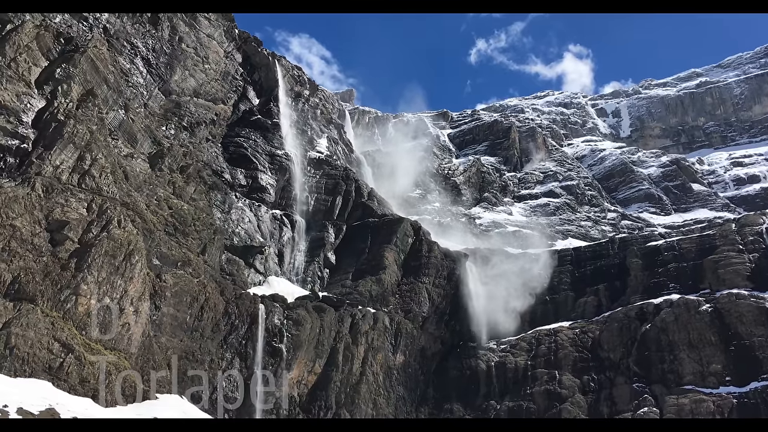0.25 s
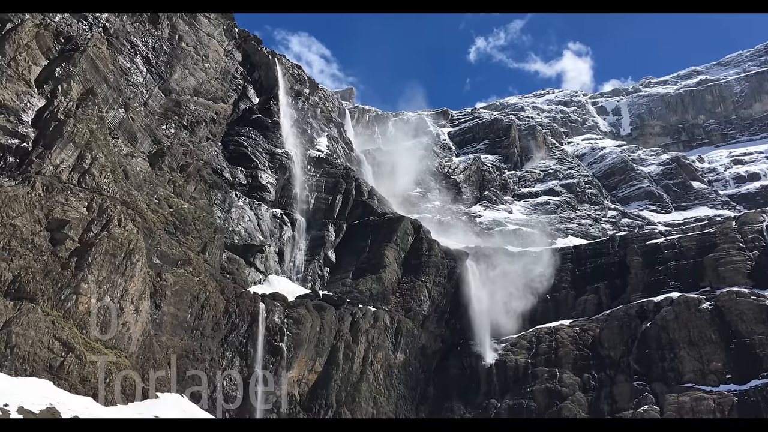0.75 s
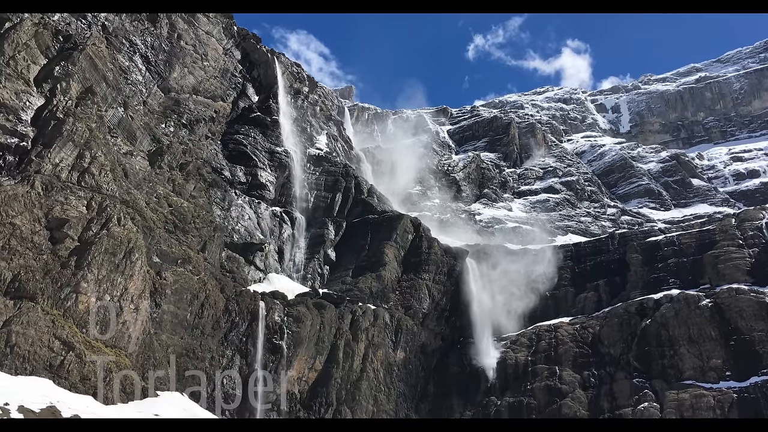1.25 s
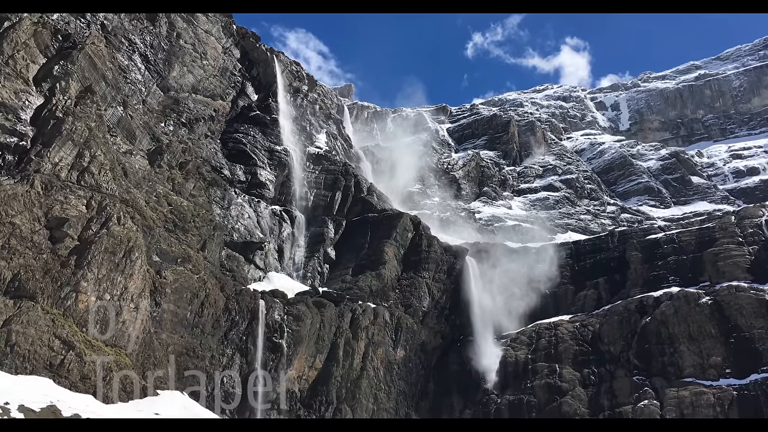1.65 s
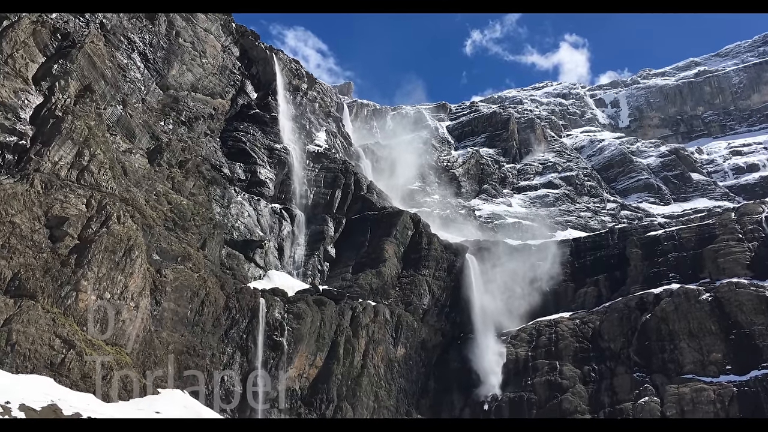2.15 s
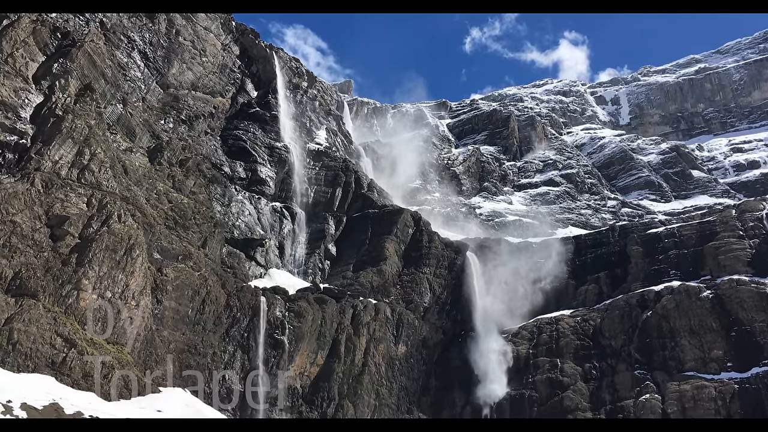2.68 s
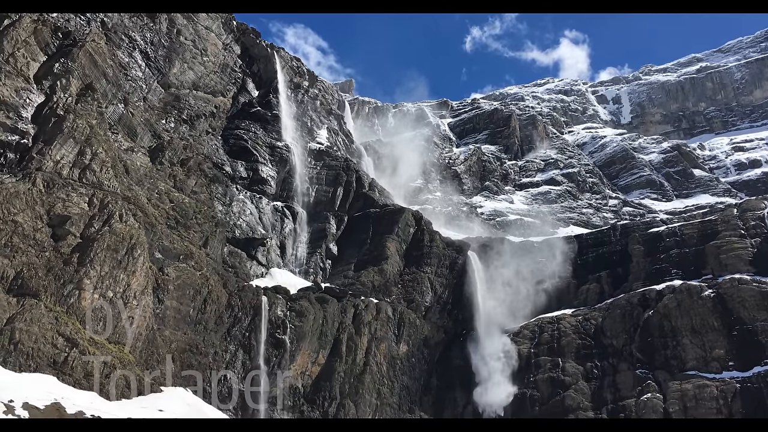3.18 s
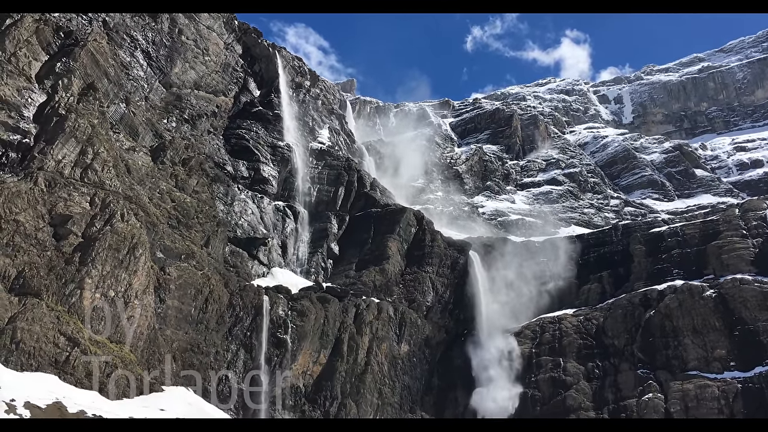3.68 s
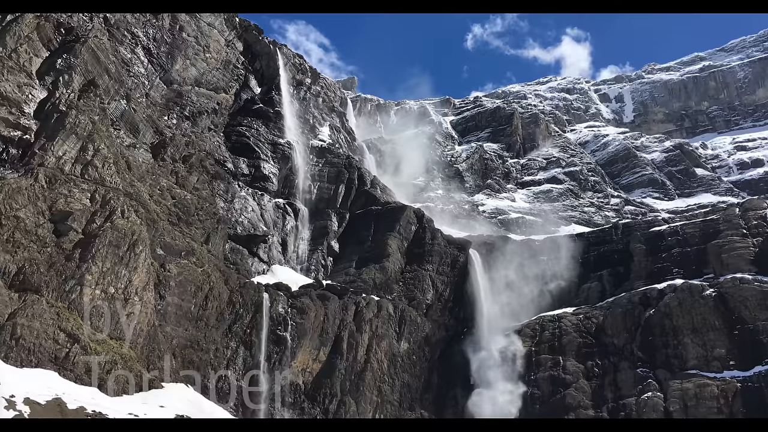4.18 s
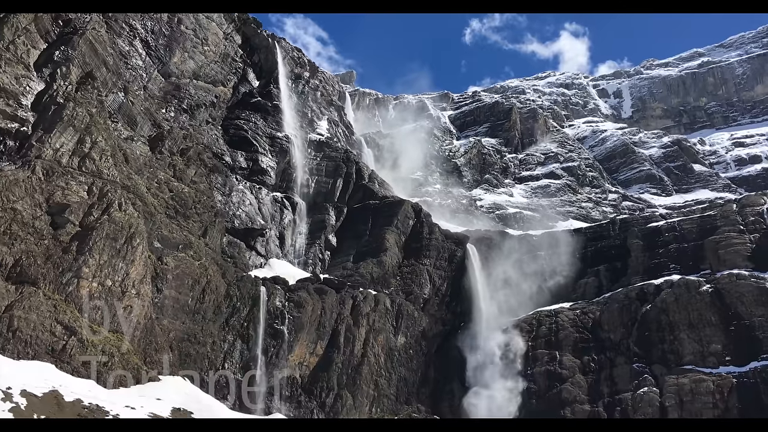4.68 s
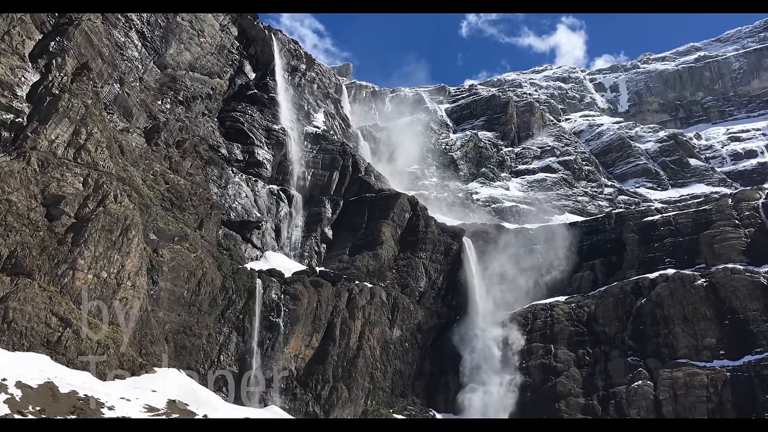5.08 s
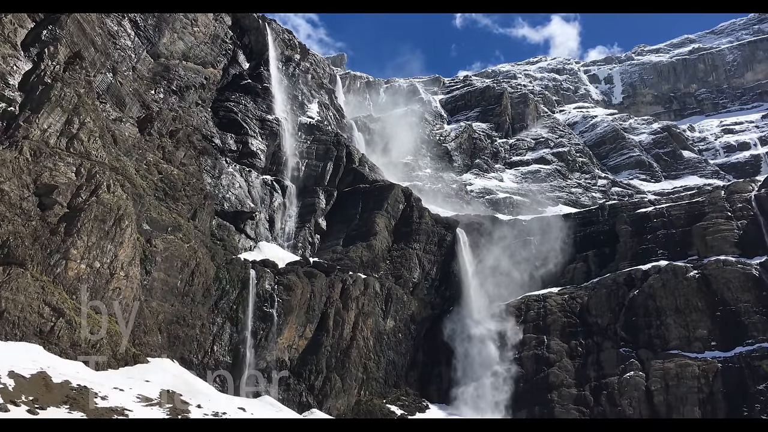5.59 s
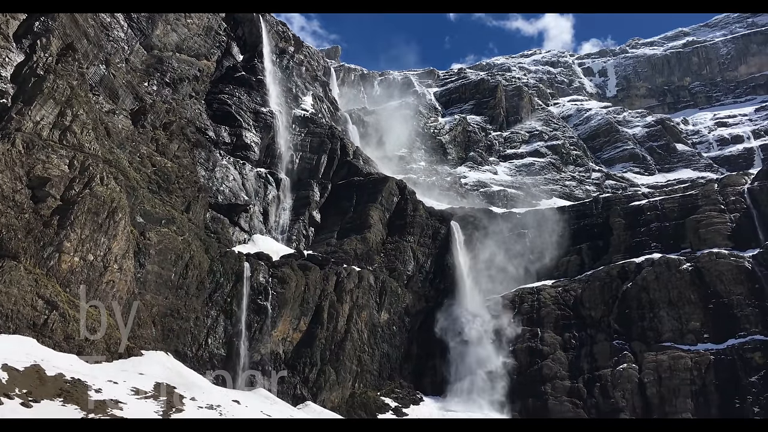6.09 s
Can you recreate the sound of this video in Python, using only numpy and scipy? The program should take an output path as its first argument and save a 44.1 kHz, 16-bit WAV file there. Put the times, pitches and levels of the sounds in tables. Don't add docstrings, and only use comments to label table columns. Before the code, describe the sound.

Low, smooth roar of far waterfalls, then tumbling snow and ice crackle and thump down a cliff, swelling into booming, muffled rumble.

```python
import sys
import numpy as np
from scipy import signal
from scipy.fft import rfft, irfft, next_fast_len
from scipy.io import wavfile
from scipy.ndimage import map_coordinates

SR = 44100
rng = np.random.default_rng(int(sys.argv[2]) if len(sys.argv) > 2 else 0)


def convert_level_to_amplitude(level_db):
    exponent = np.asarray(level_db, float) / 20
    return 10 ** exponent


def waveform_to_disk(signal):
    frames = np.transpose(np.atleast_2d(signal))
    scaled = np.clip(frames, -1, 1) * 32767
    samples = np.round(scaled).astype(np.int16)
    wavfile.write(sys.argv[1], SR, samples)


N = 279594

# frequency in Hz, level in dB per Hz.
HISS_COLOUR = [(3000, -18.5), (4800, 1.5), (6000, -3), (7600, -7.5), (9500, -6), (10500, -10),
               (11800, -7.5), (15000, -3.5), (16500, -36)]
# frequency in Hz, gain in dB.
MICROPHONE = [(18, -10.5), (32, -8.5), (42, -2), (2550, 1.5), (2800, -1), (3600, 2), (4500, 0), (4900, -3),
              (6500, -34)]
# frequency in Hz, level in dB per Hz.
FALLS_COLOUR = [(13, -44), (22, -13.5), (48, -1.5), (80, -2.5), (131, 1), (268, -5), (327, -7.5), (374, -8),
                (854, -15), (934, -13.5), (1250, -15), (2790, -25.5), (4550, -44), (5920, -75),
                (10000, -120)]
# frequency in Hz, time to fall by 60 dB in seconds.
VALLEY_DECAY = [(60, 0.97), (500, 0.93), (4000, 0.64)]

# frequency in Hz, level in dB per Hz.
BOOM_COLOUR = [(13, -39.5), (22, -21.5), (49, 3), (65, 2.5), (92, -7), (105, -0.5), (140, -23.5),
               (230, -120)]
THUD_COLOUR = [(62, -38), (105, -5.5), (210, 1), (320, -9), (420, -38.5), (700, -120)]
HEAP_COLOUR = [(62, -34.5), (105, -3.5), (124, -4), (205, 0), (285, -9), (320, -14.5), (420, -39.5),
               (700, -120)]
TUMBLE_COLOUR = [(190, -44.5), (320, -2.5), (440, 1), (495, -5.5), (674, -2.5), (840, -10.5), (880, -12.5),
                 (1140, -33), (1940, -120)]
CLATTER_COLOUR = [(520, -33), (880, 0), (1060, -1.5), (1480, -4), (1810, -9), (2110, -11.5), (3410, -28),
                  (4550, -46), (5920, -80), (10000, -120)]
SPRAY_COLOUR = [(520, -33), (880, 0), (1010, -2), (1270, -2.5), (2140, -9.5), (2790, -23), (3500, -27.5),
                (4550, -45), (5920, -69.5), (10000, -120)]
# frequency in Hz, level in dB per Hz.
CRUSH_COLOUR = [(120, -120), (250, -27), (500, -7), (1000, -2.5), (1600, -7), (2100, -16), (2800, -43.5),
                (5000, -120)]
ICE_COLOUR = [(700, -120), (1500, -28.5), (2200, -5), (2700, -9.5), (3500, -20), (4500, -29.5), (5200, -58),
              (7000, -120)]

# time in seconds, flow in dB, heft from 0 (small dry pieces) to 1 (heavy wet masses).
FLOW = [(2.37, -40, 0.03), (2.6, -37.5, 0.2), (2.7, -39, .1), (2.95, -37, .2), (3.13, -37, .25),
        (3.4, -34, .3), (3.6, -35, .35), (3.9, -34, .4), (4.3, -33.5, .45), (4.75, -35.5, .55),
        (5.05, -33, 0.5), (5.36, -35.5, 0.7), (5.7, -35, .9), (6.0, -36.5, .95), (6.34, -34.5, 0.9)]
# time in seconds, gain in dB.
FRONT = [
    (2.0, -30),
    (2.08, -13),
    (2.27, -9),
    (2.32, -5),
    (2.38, 0),
]
# time in seconds, lift of the boom in dB.
SLABS = [(2.63, 8.5), (2.78, 11), (2.92, 6.5), (3.85, 3.5), (4.18, 4.5), (4.45, 4.5), (4.78, 8), (4.9, 8),
         (5.08, 6.5), (5.22, 8.5), (5.29, 9.5), (5.48, 10.5), (5.62, 6), (5.79, 7), (6.0, 7), (6.2, 6.5),
         (6.3, 6.5)]
# start in seconds, peak in dB, thud pitch in Hz, crushed snow in dB against the peak.
LEADERS = [(0.826, -36, 300, -2), (2.111, -32, 113, -10), (2.146, -33, 178, -2), (2.17, -28, 130, -14),
           (2.212, -23, 199, -13), (2.243, -31, 205, -2), (2.261, -29, 160, -12), (2.291, -25, 400, -6),
           (2.334, -27, 420, -6), (2.345, -25, 190, -11), (2.434, -31, 410, -5), (2.551, -28, 415, -10),
           (2.818, -17.5, 300, -12), (3.147, -20, 230, -13), (3.501, -21, 420, -13)]
# start in seconds, peak in dB, thud pitch in Hz, crush in dB.
BLOCKS = [(2.378, -26.5, 458, -3.5), (2.467, -27, 426, -1), (2.605, -23, 382, -12.5), (2.719, -28, 206, -7),
          (2.775, -28.5, 251, -15), (3.221, -22, 232, -13), (3.452, -28, 148, -11.5),
          (3.544, -16.5, 448, -16.5), (3.595, -13, 219, -13), (3.651, -19.5, 254, -22.5),
          (3.671, -12, 282, -14), (3.739, -18.5, 610, -9), (3.776, -23, 194, -8),
          (3.828, -17.5, 192, -22.5), (3.897, -10.5, 217.5, -14), (4.074, -25.5, 760, -10),
          (4.117, -20.5, 259, -14), (4.367, -21, 231, -9.5), (4.586, -13, 239, -15.5),
          (4.789, -22, 673, -11.5), (4.856, -24.5, 146.3, -15.5), (5.004, -16.5, 543, -16.5),
          (5.019, -14.5, 451, -13), (5.049, -22.5, 674, -13.5), (5.084, -17, 223, -16),
          (5.351, -22.5, 597, -9), (5.534, -18.5, 190, -24), (5.749, -18.5, 195, -22.5),
          (6.208, -21, 142.4, -15), (6.301, -20, 131.4, -22.5)]


def unit(x):
    return x / np.sqrt(np.mean(x ** 2) + 1e-20)


def along(points, hz):
    f, v = np.transpose(points)
    return np.interp(np.log(hz + 1), np.log(f + 1), v)


def curves(rows):
    s, *columns = np.transpose(rows)
    return [np.interp(np.arange(N) / SR, s, c) for c in columns]


def wobble(rate):
    return map_coordinates(rng.standard_normal(N // 100), [np.arange(N) * rate / SR])


def coloured(x, spectrum):
    m = next_fast_len(N + 8192)
    gain = convert_level_to_amplitude(along(spectrum, np.fft.rfftfreq(m, 1 / SR)))
    return irfft(rfft(x, m) * gain, m)[:N]


def hiss():
    hz, t, z = signal.stft(coloured(rng.standard_normal(N), HISS_COLOUR), SR, nperseg=2048)
    flicker = 0.5 * wobble(6)[::1024] + 1.1 * wobble(35)[::1024]
    drift_hz = np.interp(t, [0, 1.5, 3, 4, 6.3], [800, 1300, 900, -100, 300])
    reach_hz = 850 * np.resize(flicker, len(t)) + drift_hz
    ragged_hz = 800 * np.repeat(rng.standard_normal((65, len(t))), 16, axis=0)[:len(hz)]
    edge_hz = 12000
    kept = (hz[:, None] < edge_hz) | (hz[:, None] + ragged_hz < edge_hz + reach_hz)
    noise = signal.istft(z * kept, SR, nperseg=2048)[1][:N]
    return convert_level_to_amplitude(-81.5) * unit(noise)


def waterfalls():
    drift = convert_level_to_amplitude(0.25 * wobble(5) + 0.37 * wobble(11) + 0.56 * wobble(40))
    return convert_level_to_amplitude(-42) * unit(coloured(drift * rng.standard_normal(N), FALLS_COLOUR))


def bumps(rows, half_s):
    t = np.arange(0, N + 64, 64) / SR
    lift = sum(db * np.exp(-((t - s) / half_s) ** 2) for s, db in rows)
    return np.interp(np.arange(N) / SR, t, lift)


def levels(cloud_s):
    flow_db, heft = curves(FLOW)
    surge_s, surge_db_per_db, surge_from_db = 0.03, 0.33, -24
    surges = [(s + surge_s / 2, surge_db_per_db * max(db - surge_from_db, 0))
              for s, db, *_ in [*BLOCKS, *LEADERS]]
    surge_db = bumps(surges, surge_s)
    boom_db = flow_db - 14.5 + 11 * heft + bumps(SLABS, half_s=0.03)
    thud_db = flow_db - 2 + 4.5 * heft + surge_db
    tumble_db = flow_db - 0.15 - 0.73 * heft + 0.47 * surge_db
    steadier_db = flow_db.mean() + 0.65 * (flow_db - flow_db.mean())
    clouded = np.arange(N) / SR > cloud_s
    clatter_db = steadier_db - 1 - 6.5 * heft - 5 * clouded + 0.2 * surge_db
    return boom_db, thud_db, tumble_db, clatter_db


def hail(per_s, spread_db, life_s, echo):
    when, size = rng.random((4000, 2)).T
    struck = np.cumsum(-np.log(1 - when) / per_s) * SR
    power = convert_level_to_amplitude(2 * spread_db * np.minimum(-np.log(1 - size), 2.2))
    heard = struck < N
    spikes = np.bincount(struck[heard].astype(int), power[heard], N)
    u = np.arange(SR // 8) / SR / life_s
    swell = np.abs(signal.fftconvolve(spikes, u * np.exp(-u))[:N])
    return (swell / swell.mean() + echo) / (1 + echo)


def slide():
    cloud_s = 3.11
    heap_s = 5.0
    shared = hail(per_s=65, spread_db=0.5, life_s=0.0062, echo=1.4)
    boom_db, thud_db, tumble_db, clatter_db = levels(cloud_s)

    def debris(colour, part, life_s, echo):
        own = hail(per_s=42, spread_db=4.5, life_s=life_s, echo=echo)
        power = part * shared + (1 - part) * own
        return unit(coloured(np.sqrt(power) * rng.standard_normal(N), colour))

    t = np.arange(N) / SR
    heaped = np.clip((t - heap_s) / 0.54 + 0.5, 0, 1)
    muffled = np.clip((t - cloud_s) / 0.012, 0, 1)
    boom = debris(BOOM_COLOUR, 0.13, 0.032, 6.4)
    thud = np.sqrt(1 - heaped) * debris(THUD_COLOUR, 0.17, 0.005, 6.9)
    thud += np.sqrt(heaped) * debris(HEAP_COLOUR, 0.57, 0.006, 6.2)
    tumble = debris(TUMBLE_COLOUR, 0.68, 0.0024, 0.76)
    clatter = np.sqrt(1 - muffled) * debris(CLATTER_COLOUR, 0.24, 0.0016, 4.0)
    clatter += np.sqrt(muffled) * debris(SPRAY_COLOUR, 0.23, 0.0041, 5.6)
    mass = convert_level_to_amplitude(boom_db) * boom + convert_level_to_amplitude(thud_db) * thud + convert_level_to_amplitude(tumble_db) * tumble + convert_level_to_amplitude(clatter_db) * clatter
    return convert_level_to_amplitude(curves(FRONT)[0]) * mass


def valley(x, wet_db):
    hz, t, z = signal.stft(rng.standard_normal(SR), SR, nperseg=512)
    decay = convert_level_to_amplitude(-60 * t / along(VALLEY_DECAY, hz)[:, None])
    tail = signal.istft(z * decay, SR, nperseg=512)[1]
    return x + convert_level_to_amplitude(wet_db) * signal.fftconvolve(x, tail / np.linalg.norm(tail))[:N]


def blocks(table, thud_db, grit_db, ice_db):
    thuds, crush, ice = np.zeros((3, N + SR))
    t = np.arange(SR // 16) / SR
    puff = t * np.exp(-t / 0.0035)
    late = np.exp(-((t - 0.009) / 0.003) ** 2)
    for s, db, hz, crush_db in table:
        start = round(s * SR)
        u = t * hz / 0.55
        thud = u * u * np.exp(-u) * np.sin(2 * np.pi * hz * t)
        thuds[start + SR // 400:][:len(t)] += convert_level_to_amplitude(db + thud_db) * thud
        snow_grit, ice_grit = rng.standard_normal((2, len(t)))
        broken_db = db + crush_db + grit_db
        crush[start:][:len(t)] += convert_level_to_amplitude(broken_db) * unit(puff * snow_grit)
        brittle_db = 0.5 * min(db + 24.5, 6)
        ice[start:][:len(t)] += convert_level_to_amplitude(broken_db + ice_db + brittle_db) * unit(late * ice_grit)
    blows = thuds[:N] + coloured(crush[:N], CRUSH_COLOUR) + coloured(ice[:N], ICE_COLOUR)
    return valley(blows, wet_db=-12.5)


def scene():
    leaders = blocks(LEADERS, thud_db=2, grit_db=4, ice_db=-13)
    large = blocks(BLOCKS, thud_db=-1.0, grit_db=-4, ice_db=-12.5)
    return (waterfalls() + slide() + leaders + large)[None]


def roll_off(x):
    return signal.sosfilt(signal.butter(12, 15000, fs=SR, output="sos"), x)


def record(dry):
    ceiling = 0.18
    heard = dry[0] / (1 + np.abs(dry[0] / ceiling) ** 4) ** (1 / 4)
    mix = coloured(heard, MICROPHONE) + hiss()
    return roll_off(mix[None])


dry = scene()
out = record(dry)
waveform_to_disk(out)
```